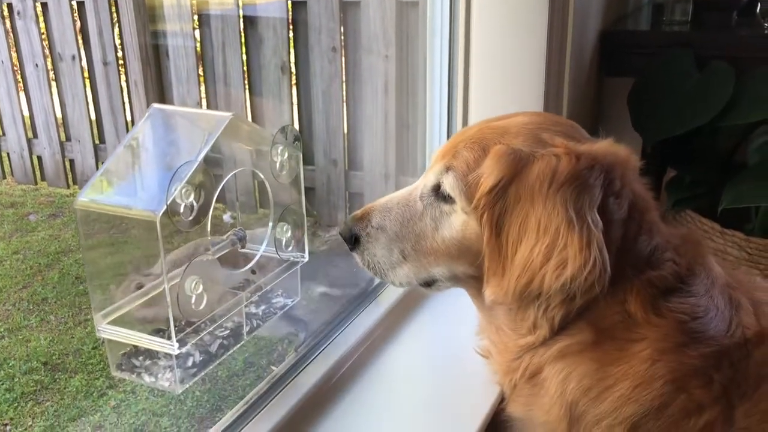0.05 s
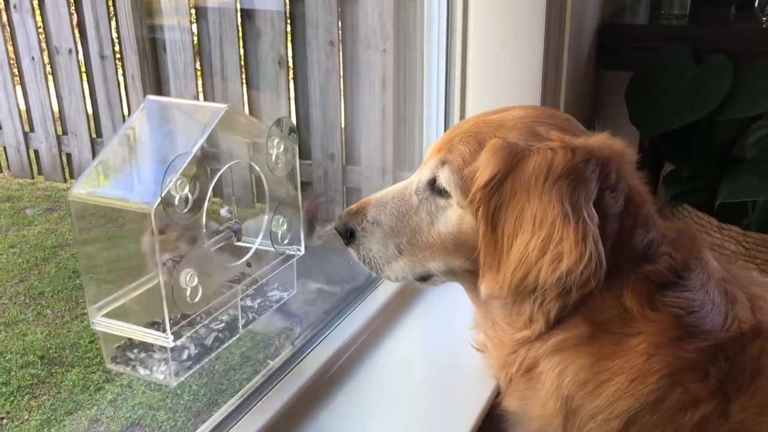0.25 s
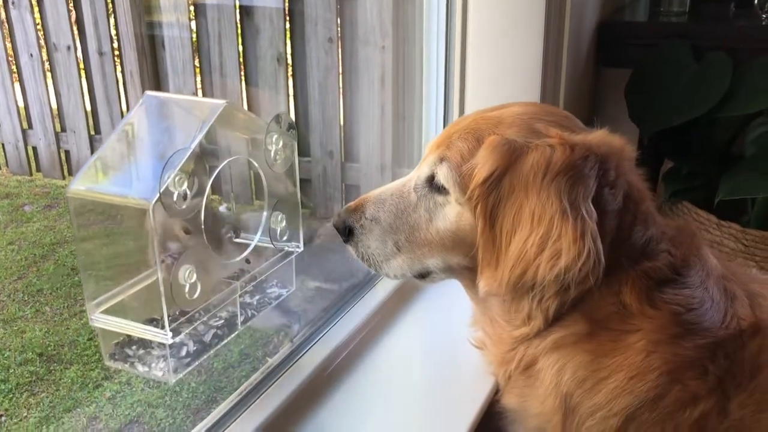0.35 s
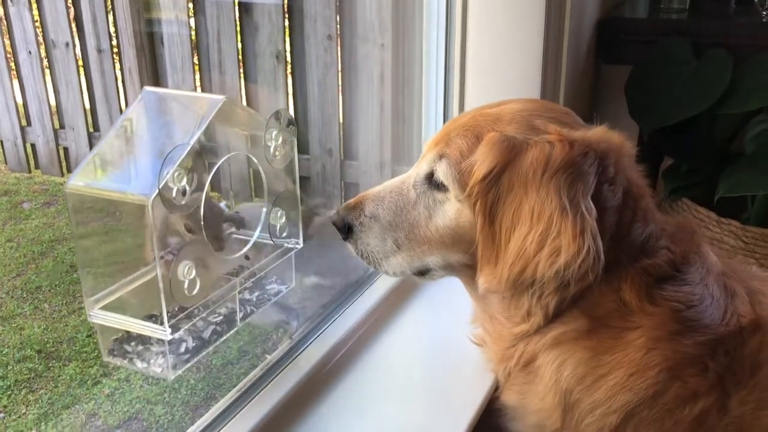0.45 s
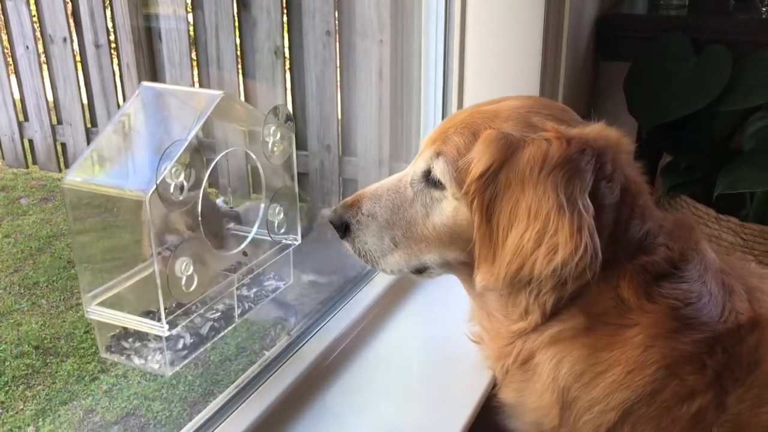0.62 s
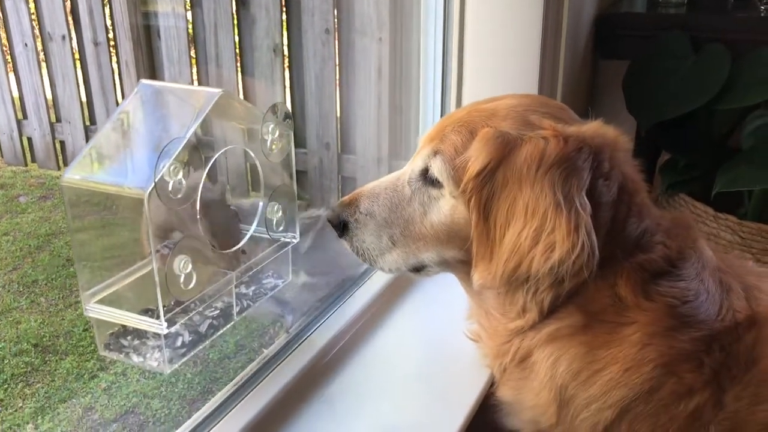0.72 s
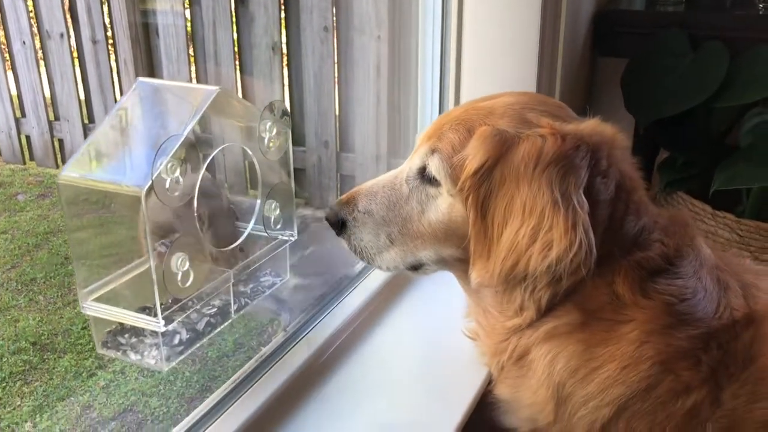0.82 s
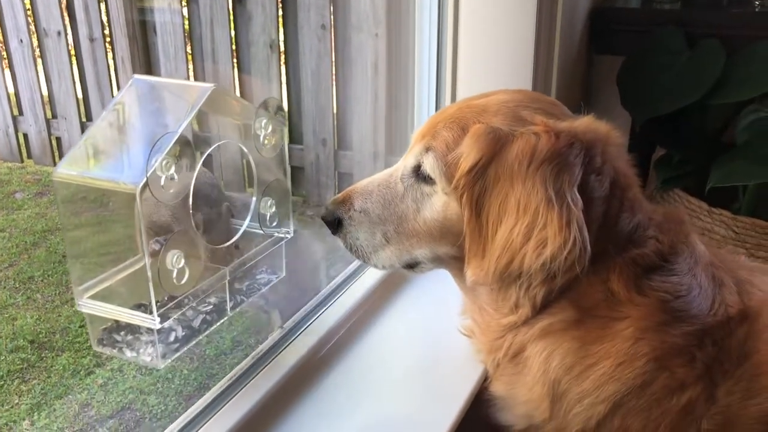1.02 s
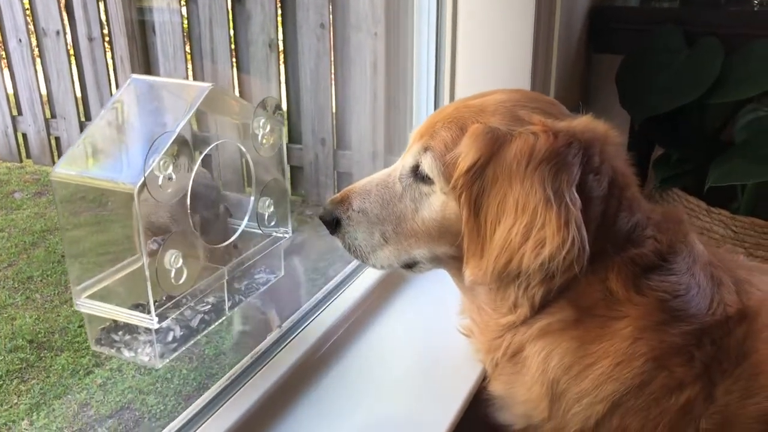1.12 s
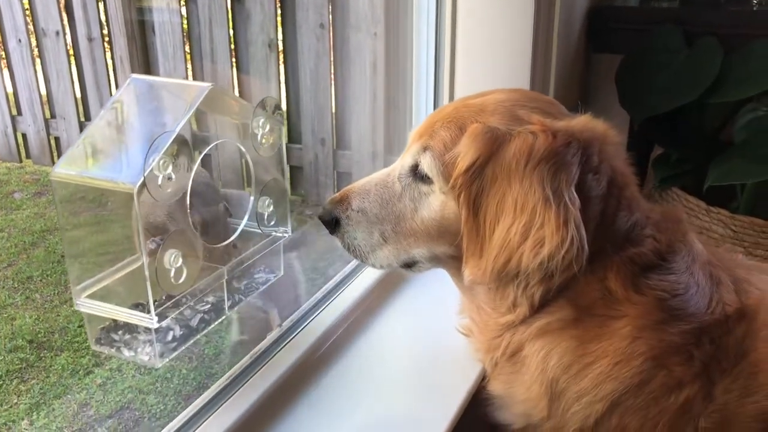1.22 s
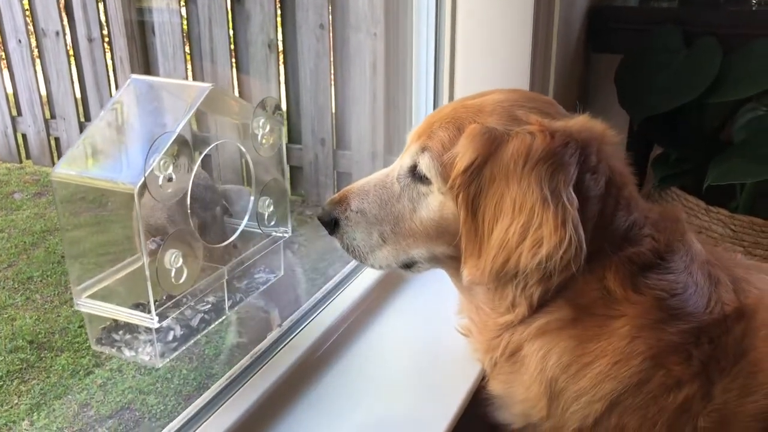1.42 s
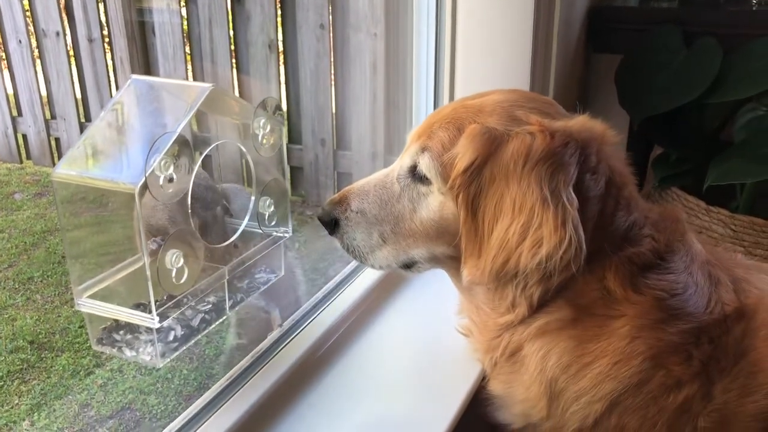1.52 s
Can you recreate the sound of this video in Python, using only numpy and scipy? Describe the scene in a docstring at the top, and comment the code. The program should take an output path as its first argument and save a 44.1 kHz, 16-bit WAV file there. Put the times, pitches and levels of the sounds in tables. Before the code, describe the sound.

Irregular sharp taps and knocks of an animal in a plastic window feeder, heard indoors.

```python
"""Small animal in a window feeder

Heard from indoors on one microphone: an animal shifts about in a plastic feeder stuck to the pane.
Its taps and knocks spread through the glass, treble first, and ring the feeder, the pane and the room.
A short judder and a few scuffs and soft bumps come between them, over low rumble and mains hum."""
import sys
import numpy as np
from scipy import signal
from scipy.fft import rfft, irfft
from scipy.io import wavfile

SR = 44100
rng = np.random.default_rng(int(sys.argv[2]) if len(sys.argv) > 2 else 0)


def generate_wav(signal):
    """Clip the signal to [-1, 1] and save it as 16-bit WAV at the path in sys.argv[1]."""
    frames = np.transpose(np.atleast_2d(signal))
    scaled = np.clip(frames, -1, 1) * 32767
    pcm = np.round(scaled).astype(np.int16)
    wavfile.write(sys.argv[1], SR, pcm)


N = 68355

# reverberation of the room: f/Hz, level/dB against the direct sound, t60/s
ROOM = [(119, -6.5, 0.53), (407, -3, 1), (990, -3.5, 0.68), (2070, -5.5, 0.47), (4000, -10, 0.65),
        (5300, -11, 0.73), (6200, -13, 0.63), (7800, -17, 0.53), (9840, -19, 0.4), (13800, -20, 0.76)]
ROOM_BUILD_S = 0.0066


def undb(db):
    """Decibels to amplitude."""
    return 10 ** (np.asarray(db) / 20)


def at(hz, table, column=1):
    """Read a column of a table on a log-frequency axis."""
    table = np.array(table)
    return np.interp(np.log(hz), np.log(table[:, 0]), table[:, column])


def freqs():
    """The frequencies of the spectrum, kept above zero."""
    return np.maximum(np.fft.rfftfreq(N, 1 / SR), 1)


def noise(gain):
    """Noise of rms 1 with the given spectrum."""
    x = irfft(rfft(rng.standard_normal(N)) * gain, N)
    return x / x.std()


def bands():
    """Third-octave bands: centre frequency and gain over the spectrum."""
    for hz in 63 * 2 ** (np.arange(25) / 3):
        yield hz, np.cos(np.pi / 2 * np.clip(3 * np.log2(freqs() / hz), -1, 1))


def ring(t, build_s, t60):
    """An envelope that builds up and dies away."""
    t = np.maximum(t, 0)
    return (1 - np.exp(-(t / build_s) ** 2)) * np.exp(-np.log(1000) * t / t60)


def with_energy(x, root_energy):
    """Scale a burst to the given root energy."""
    return x * root_energy / np.sqrt(np.sum(x ** 2) + 1e-20)


def noise_burst(envelope, hz, octaves):
    """A bell-shaped band of noise with the shape and energy of the envelope."""
    bell = np.exp(-(np.log2(freqs() / hz) / octaves) ** 2 / 2)
    return with_energy(envelope * noise(bell), np.linalg.norm(envelope))


def coloured(x, response):
    """A causal filter with the given response (f/Hz, level/dB)."""
    cepstrum = irfft(np.log(undb(at(freqs(), response))), N)
    cepstrum[1:N // 2] *= 2
    cepstrum[N // 2:] = 0
    return irfft(rfft(x) * np.exp(rfft(cepstrum)), N)


def room_tone(floor_db=-55.5, hum_hz=59.5, hum_db=-62):
    """Indoor rumble, faint hiss and mains hum."""
    # spectrum of the rumble and hiss: f/Hz, relative level/dB
    floor = [(15, -63), (25, -12), (120, 1), (166, -5.5), (217, -1.5), (285, -6), (427, -11.5), (607, -21),
             (677, -18.5), (1330, -26.5), (1440, -30), (1700, -33.5), (3520, -35.5), (7710, -37.5),
             (16000, -44.5)]
    hum = np.sqrt(2) * np.sin(2 * np.pi * (hum_hz * np.arange(N) / SR + rng.random()))
    return undb(floor_db) * noise(undb(at(freqs(), floor))) + undb(hum_db) * hum


def diffuse_tail(x):
    """In the furnished room the energy of each band lingers and dies away."""
    t, spectrum, tail = np.arange(SR // 2) / SR, rfft(x), np.zeros(N)
    for hz, gain in bands():
        decay = with_energy(ring(t, ROOM_BUILD_S, at(hz, ROOM, column=2)), undb(at(hz, ROOM)))
        power = signal.fftconvolve(irfft(spectrum * gain, N) ** 2, decay ** 2)[:N]
        tail += np.sqrt(np.abs(power)) * noise(gain)
    return tail


def reflections(x):
    """The same room's reflections of a clear tone, which keep its pitch."""
    t, response = np.arange(N) / SR, np.zeros(N)
    for hz, gain in bands():
        tail = noise(gain) * ring(t, ROOM_BUILD_S, at(hz, ROOM, column=2))
        response += with_energy(tail, np.sqrt(np.mean(gain ** 2)) * undb(at(hz, ROOM)))
    return signal.fftconvolve(x, response)[:N]


def swells(table):
    """Noises that rise and fall, each in its own band."""
    t, sound = np.arange(N) / SR, np.zeros(N)
    for start, length, hz, octaves, db in table:
        arch = np.sin(np.pi * np.clip((t - start) / length, 0, 1))
        sound += undb(db) * noise_burst(arch, hz, octaves)
    return sound


def bumps():
    """Soft bumps, heard as brief swells in the bass."""
    # low bumps: t/s, length/s, centre f/Hz, width/octaves, level/dB
    thuds = [(.385, 0.031, 65, .25, -51), (.385, .17, 145, .25, -54), (.66, .12, 117.5, 0.21, -55.5)]
    return swells(thuds)


def scuffs():
    """The animal rubs faintly against the feeder."""
    # rubs: t/s, length/s, centre f/Hz, width/octaves, level/dB
    rubs = [(0.376, 0.042, 1100, 0.45, -58), (0.371, 0.032, 2370, 0.17, -66),
            (0.383, 0.021, 4700, 0.4, -64), (0.795, 0.097, 2500, 0.91, -61.5), (.765, 0.069, 9700, .2, -70)]
    return swells(rubs)


def judder(start_s=.2285, length_s=.031, edge_s=.003, tone_hz=310.6, level_db=-42.5):
    """Plastic drags briefly with a low, rough tone."""
    # rough sidebands: centre f/Hz, width/octaves, level/dB relative to the tone's peak
    sidebands = [(174, 0.26, -6), (510, 0.21, -12.5)]
    t = np.arange(N) / SR - start_s
    gate = np.clip(np.minimum(t, length_s - t) / edge_s, 0, 1)
    rough = sum(undb(db) * noise_burst(gate, hz, octaves) for hz, octaves, db in sidebands)
    return undb(level_db) * (gate * np.sin(2 * np.pi * tone_hz * t) + rough)


def since_arrival(age, hz, travel_s=0.002108):
    """Time since a bending wave arrived: it takes travel_s at 1 kHz, longer in the bass."""
    return age - travel_s * np.sqrt(1000 / hz)


def feeder_modes(modes, age, blow):
    """Clear resonances of the plastic, each driven by the blow's strength at its frequency."""
    sound = 0
    for hz, db, t60 in modes:
        t = since_arrival(age, hz)
        # dividing by t60 keeps the height of the spectral peak independent of the decay
        amplitude = 2 * np.log(1000) / (t60 * SR) * undb(db + at(hz, blow))
        sound += amplitude * ring(t, build_s=0.0015, t60=t60) * np.sin(2 * np.pi * hz * t)
    return sound


def knocks():
    """Each blow rings the pane densely and the feeder in clear modes; returns the two apart."""
    # blows: t/s, pane decay factor, pane build-up/s at 4 kHz, box gain/dB, wall gain/dB,
    # then relative level/dB at each of blow_hz
    blows = [(.087, .7, 0.00091, -12, -7.5, -29, -26, -50, -57, -46, -33.5, -52),
             (0.149, 0.62, 0.00074, -20, -6, -33, -39, -50, -55, -37, -34, -52),
             (0.2548, 1.2, .001, -17, -8, -8, -8, -17, -19, -5, -7, -28),
             (0.4331, 0.93, .002, 0.5, 4, -10, -4, -10, -7, -6, -11.5, -29),
             (0.6364, 1.01, 0.0018, -21, 4.5, 2, -1, -9, -6.5, 6, 5.5, -19),
             (.942, 0.24, 0.0007, -19, -17, -49, -23, -21.5, -22.5, -34, -33, -52),
             (1.0452, 0.83, 0.0041, 3, -26, 5.5, 3, 3.5, -4.5, 2, 0.5, -22),
             (1.1801, 1, 0.00093, 4, 1, -3.5, -13.5, -8, -15, -20.5, -13.5, -37),
             (1.192, 1.1, 0.00057, 6, -6, -42, -51, -25, -21.5, -23, -19.5, -35),
             (1.265, 1.14, 0.00061, 0, -19, -3.5, -9, -13.5, -13, -22, -23.5, -43)]
    # points of a blow's spectrum: f/Hz
    blow_hz = [300, 800, 2000, 3500, 5400, 8000, 13000]
    # decay of the glass: f/Hz, t60/s before the blow's factor
    pane_t60 = [(200, 0.088), (800, 0.19), (2000, 0.15), (5000, 0.05), (8000, 0.02), (14000, 0.015)]
    # modes of the whole feeder box: f/Hz, relative level/dB, t60/s
    box_modes = [(262, 7, .08), (318, 5, .07), (334, 4, .3), (420, 5, .55), (527, 5, .35), (785, 10, .16),
                 (826, 8, .09), (1389, 1, .4), (1683, 2, .2), (1797, 2, .3), (1965, 2, .2), (2050, 2, .24),
                 (2915, 7, .05), (3021, 3, .3)]
    # modes of its thin wall: f/Hz, relative level/dB, t60/s
    wall_modes = [(458, 8, .35), (1058, 4, .3), (1277, 8, .3), (2620, 4, .15), (3005, 6, .08),
                  (3600, 1, .04), (4300, 4, .04), (4545, 6, .07), (5305, 6, .06), (5545, 5, .06),
                  (5850, 3, .05), (7780, 2, .035), (8300, 1, .03), (8800, 3, .02)]
    t, pane, feeder = np.arange(N) / SR, np.zeros(N), np.zeros(N)
    pane_bands = [(hz, np.mean(gain ** 2), noise(gain)) for hz, gain in bands()]
    for start, decay_factor, build_s, box_db, wall_db, *levels in blows:
        span = slice(int(start * SR), int(start * SR) + SR // 2)
        age = t[span] - start
        blow = list(zip(blow_hz, levels))
        for hz, share, wave in pane_bands:
            band_build_s = build_s * (4000 / hz) ** 0.1  # the treble builds up sooner
            envelope = ring(since_arrival(age, hz), band_build_s, decay_factor * at(hz, pane_t60))
            pane[span] += with_energy(wave[span] * envelope, np.sqrt(share) * undb(at(hz, blow)))
        feeder[span] += undb(box_db) * feeder_modes(box_modes, age, blow)
        feeder[span] += undb(wall_db) * feeder_modes(wall_modes, age, blow)
    return pane, feeder


def scene():
    """Pane and feeder reach the microphone directly and by way of the room, over the room tone."""
    # tone colour of the ringing glass: f/Hz, gain/dB
    pane_response = [(70, -8), (190, -9), (260, 2.5), (500, 2.5), (600, -2), (690, -5), (810, 1.5),
                     (950, -5), (1060, -4.5), (1250, -3), (3100, 0), (3800, -3), (4400, 1), (5000, -3),
                     (5800, -2), (6550, -4), (7400, -1), (8400, -3), (9100, -5.5), (12500, 0.5), (16000, 0)]
    pane, feeder = knocks()
    feeder = feeder + judder() + scuffs()
    pane_in_room = coloured(pane + diffuse_tail(pane), pane_response)
    feeder_in_room = feeder + undb(-1) * reflections(feeder)
    return (pane_in_room + feeder_in_room + bumps() + room_tone())[None]


def record(dry, low_cut_hz=35.5, top_hz=16000):
    """The recorder cuts the deep bass and the top."""
    dry = signal.sosfilt(signal.butter(4, low_cut_hz, "high", fs=SR, output="sos"), dry)
    return signal.sosfilt(signal.ellip(10, .2, 70, top_hz, fs=SR, output="sos"), dry)


dry = scene()
out = record(dry)
generate_wav(out)
```